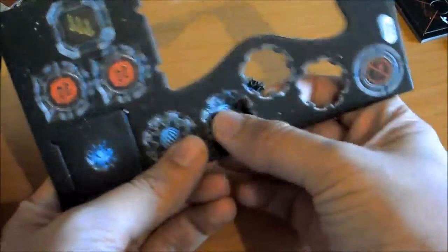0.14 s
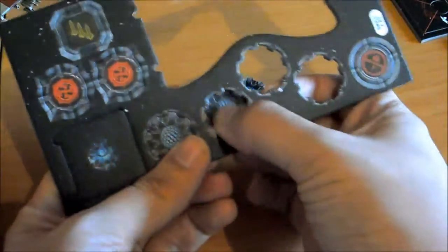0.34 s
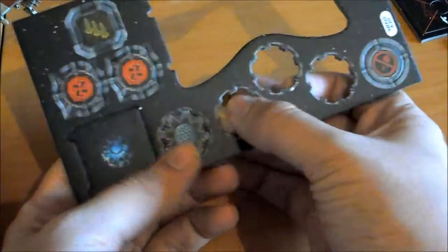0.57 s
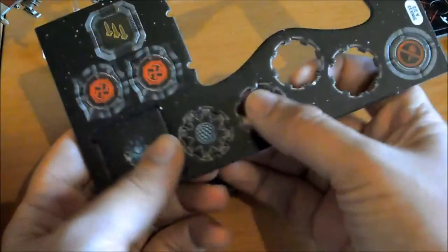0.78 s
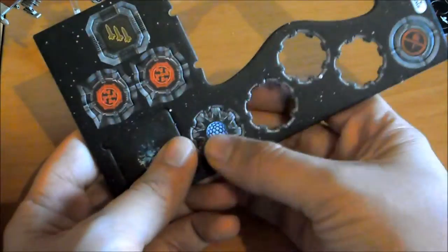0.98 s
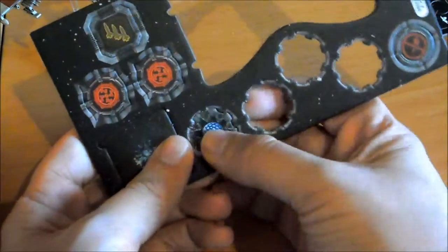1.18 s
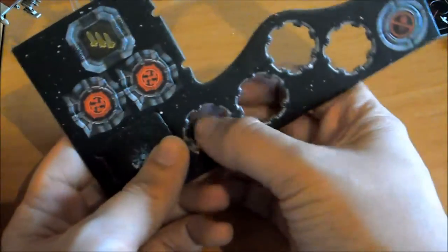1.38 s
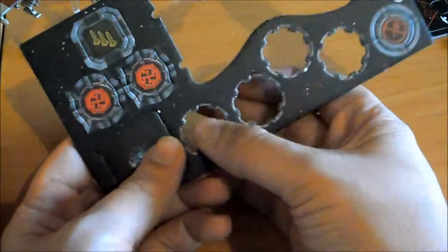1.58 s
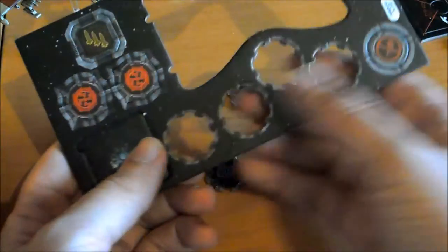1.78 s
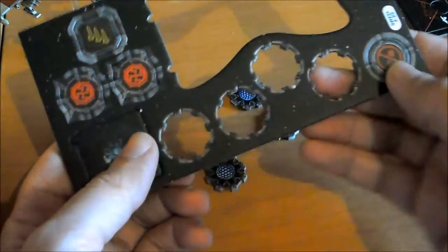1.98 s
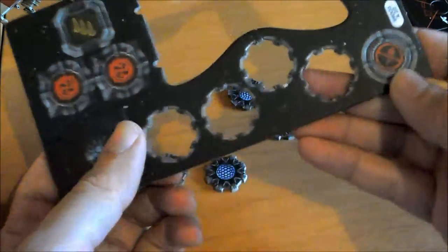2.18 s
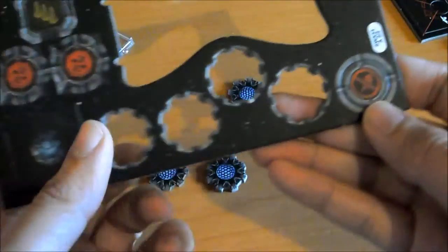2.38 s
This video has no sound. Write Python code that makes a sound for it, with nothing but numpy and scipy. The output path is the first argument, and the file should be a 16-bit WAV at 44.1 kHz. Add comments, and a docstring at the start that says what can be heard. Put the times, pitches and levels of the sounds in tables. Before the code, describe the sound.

Thick card tabs tear with dry, crackling snaps, and freed tokens drop and bounce on wood. Two rounds, with a faint soft rush around the second, over steady hiss and a low electronic buzz, closely miked.

```python
"""A quick cluster of snaps, then clacks on wood: cardboard tokens pushed out of a punched board.
Each snap is a tick and a crackle of smaller ticks that tears a tab and rings the board.
Each freed token drops on a wooden table and bounces, ringing its own modes; a small room answers.
A soft low-mid rush swells and fades behind, made of coloured noise.
A close, small mono camera microphone hisses and its electronics buzz at the frame rate."""
import sys
import numpy as np
from scipy import signal
from scipy.fft import rfft, irfft
from scipy.io import wavfile

SR = 44100
rng = np.random.default_rng(int(sys.argv[2]) if len(sys.argv) > 2 else 0)


def pcm_store(signal):
    """Save signal as 16-bit PCM."""
    levels = np.round(np.clip(np.atleast_2d(signal), -1, 1) * 32767)
    wavfile.write(sys.argv[1], SR, levels.astype(np.int16).T)


def gain_from_decibels(decibels):
    """Convert decibel values to linear amplitude factors."""
    exponent = np.asarray(decibels, float) / 20
    return 10 ** exponent


N = 107559  # length in samples


def on_log(hz, table):
    """Reads a table of frequency and value on a log-frequency axis."""
    table = np.array(table, float)
    return np.interp(np.log(np.maximum(hz, 1)), np.log(table[:, 0]), table[:, 1])


def noise(colour, size=N):
    """White noise shaped to a colour of frequency and relative dB, then scaled to rms 1."""
    spectrum = rfft(rng.standard_normal(size))
    gain = gain_from_decibels(on_log(np.fft.rfftfreq(size, 1 / SR), colour))
    shaped = irfft(spectrum * gain, size)
    return shaped / shaped.std()


def minimum_phase(gain):
    """Spectrum with the given gain whose energy comes as early as possible (folded cepstrum)."""
    cepstrum = irfft(np.log(gain))
    cepstrum[1:len(cepstrum) // 2] *= 2
    cepstrum[len(cepstrum) // 2 + 1:] = 0
    return np.exp(rfft(cepstrum))


def crackle_push(length_s):
    """Force of one hit: a sharp unit tick, then sparse smaller ticks of random sign that die away."""
    grains_per_s, scatter_db = 5000, 2.5
    crackle_db = -0.5  # crackle energy per ms of length, against the first tick
    t = np.arange(4096) / SR
    chance, side, size = rng.random((3, 4096))
    size_db = -scatter_db * np.log(1 - size) - scatter_db
    grains = (chance < grains_per_s / SR) * np.sign(side - .5) * gain_from_decibels(size_db)
    push = grains * np.exp(-(t / max(length_s, 1e-4)) ** 3)
    # the .1 keeps a crackle with hardly any grains from being blown up
    push = push * gain_from_decibels(crackle_db) * np.sqrt(1000 * length_s / (np.sum(push ** 2) + .1))
    push[0] = -1
    return push


def ringing(hz, mode_db, t60_s):
    """Sum of decaying sine modes with alternating signs; their levels vary a little at every hit."""
    mode_scatter_db = 1.0
    t = np.arange(4096) / SR
    level = gain_from_decibels(mode_db + mode_scatter_db * rng.standard_normal(len(hz)))
    gain = level * (-1) ** np.arange(len(hz))
    waves = np.sin(2 * np.pi * hz[:, None] * t) * 1000 ** (-t / t60_s[:, None])
    return (gain[:, None] * waves).sum(axis=0)


def hits(events, modes, crack, bass_hz, db):
    """Each hit: a tick that rings the modes, then a crackle heard as a broad crack; each has its tone."""
    crack_db = 10.5
    treble_hz, top_shelf_hz = 6160, 8560  # corners of the treble and top columns
    radiates_above_hz = 230  # small objects send out little bass
    ring_cycles, longest_ring_s = 90, .04  # limits on how long a mode of card or wood lasts
    f = np.fft.rfftfreq(8192, 1 / SR) + 1
    hz, mode_db, t60_s = np.array(modes, float).T
    t60_s = np.minimum(t60_s, np.minimum(ring_cycles / hz, longest_ring_s))
    crack_tone = minimum_phase(gain_from_decibels(crack_db + on_log(f, crack)))

    def above(corner_hz):
        return 1 / (1 + (corner_hz / f) ** 8)

    out = np.zeros(N + 8192)
    for start_s, level_db, length_s, bass_db, treble_db, top_db in events:
        crackle = rfft(crackle_push(length_s), 8192) * crack_tone
        ring = rfft(ringing(hz, mode_db, t60_s), 8192)
        tilt_db = bass_db / (1 + (f / bass_hz) ** 6)
        tilt_db = tilt_db + treble_db * above(treble_hz)
        tilt_db = tilt_db + (top_db - treble_db) * above(top_shelf_hz)
        tone = minimum_phase(gain_from_decibels(tilt_db) * np.sqrt(above(radiates_above_hz)))
        i = int(start_s * SR)
        out[i:i + 8192] += gain_from_decibels(level_db + db) * irfft((crackle - ring) * tone)
    return out[:N]


def tearing_snaps():
    """Tabs tear in clusters of snaps, each one a tick that rings the board, followed by a crackle."""
    # tabs tearing: start_s, level_db (relative), crackle_length_s, bass_db, treble_db, top_db
    tab_snaps = [(.1143, -41.5, 0.012, 22, -2, 10.5), (.1203, -18.5, 0.0035, -2.5, -11, 5.5),
                 (.1253, -17.5, 0.0016, 0, -10, -5), (.1297, -26.5, 0.0033, -23, -3, -1),
                 (.2355, -37.5, .002, -29, -7, 8), (1.1593, -30, 0.0054, 3, -2, -7),
                 (1.1772, -34, 0.006, 22, 6, -5), (1.1803, -20, .001, 3.5, 6, 7),
                 (1.1822, -34, 0.0074, 20.5, -5, 0), (1.1962, -24, 0.0094, 6.5, 0, -1)]
    # resonances of the punched board: pitch_hz, level_db (relative), t60_s (before the ring limits)
    board_modes = [(258, -14, 0.042), (447, -14, 0.014), (883, -3.5, 0.043), (1134, -10.5, 0.037),
                   (1320, -3.5, 0.041), (1630, -1, 0.026), (2580, -21, 0.0089), (3700, -2, 0.013),
                   (4230, -17, 0.0055), (8200, -6, 0.0093)]
    # tone of tearing board: pitch_hz, level_db (relative)
    board_crack = [(150, -52), (500, 5.5), (1500, 0.5), (2500, 12), (4000, 10.5), (6000, 8.5), (8500, 14),
                   (11000, 0)]
    return hits(tab_snaps, board_modes, board_crack, bass_hz=1270, db=-13)


def token_drops():
    """Tokens meet the wooden table with edge, face and bounces; each contact rings and rattles."""
    # contacts with the table: start_s, level_db (relative), rattle_length_s, bass_db, treble_db, top_db
    table_contacts = [(.5353, -23, 0.0017, 2.5, -15, -1), (.5376, -25, 0.0047, 6, -4, -12),
                      (.5526, -21.5, 0.004, -1, -5, 2), (.6384, -27.5, 0.0067, -9, -22, 28.5),
                      (.6425, -23.5, 0.0024, -1, -1, -1), (.648, -37.5, 0.0043, 4, -8, -4),
                      (.6943, -38, 0.0044, -1, -15, -5), (.7163, -33, 0.012, -2, -19, -1),
                      (.7216, -61, 0.0012, 5, -13, -3), (.7272, -36, 0.0039, 4.5, -20, 29),
                      (.7785, -38, 0.0021, -5, -21, -3), (.7815, -36, 0.0034, -2, -8, -4),
                      (.8195, -38.5, 0.011, -10, -8, 6), (1.4743, -25, 0.009, 1.5, -33, -12),
                      (1.4869, -13.5, 0.00025, -13.5, 22.5, -6.5), (1.4885, -22, 0.0027, -2.5, 19.5, -3),
                      (1.6235, -28, 0.008, -6, 4.5, -5), (1.7018, -32.5, 0.0057, 4, 24, 0)]
    # resonances of a token on the table: pitch_hz, level_db (relative), t60_s (before the ring limits)
    token_modes = [(308, -21, 0.06), (750, -6.5, 0.025), (930, -12.5, 0.03), (1239, -4.5, 0.041),
                   (1666, -4.5, .03), (1812, -14.5, 0.061), (2270, -7.5, 0.038), (2597, -5.5, 0.027),
                   (3440, -2.5, 0.04), (4140, -4, 0.025), (4720, -24, 0.011), (9900, -3.5, 0.0027)]
    # tone of card striking wood: pitch_hz, level_db (relative)
    token_crack = [(150, -25), (500, -12), (1200, 11.5), (2500, 16.5), (4000, 9.5), (5500, 9), (7000, -1),
                   (9500, 2.5), (11000, -34)]
    return hits(table_contacts, token_modes, token_crack, bass_hz=1580, db=-11.5)


def room(source):
    """Diffuse tail: half-octave bands of noise, each fading at its own rate, convolved with the source."""
    # reverberation time: pitch_hz, t60_s
    room_t60 = [(300, 0.34), (1000, 0.12), (3000, 0.23), (6000, 0.19), (10000, 0.19)]
    # tone of the tail: pitch_hz, level_db (relative)
    room_colour = [(300, 0), (1000, 0.5), (3000, -2.5), (6000, -4.5), (10000, -3.5)]
    room_db, gap_s = -7, 0.001
    t, tail = np.arange(SR // 2) / SR, 0
    for hz in 180 * 2 ** np.arange(0, 6.1, .5):
        limits_hz = [hz / 2 ** 0.15, hz * 2 ** 0.33]
        band_pass = signal.butter(2, limits_hz, "band", fs=SR, output="sos")
        band = signal.sosfilt(band_pass, rng.standard_normal(len(t)))
        fade = 1000 ** (-t / on_log(hz, room_t60))
        tail = tail + gain_from_decibels(on_log(hz, room_colour)) * band * fade
    # silent for one gap, then rising to full over another
    tail = tail * np.clip(t / gap_s - 1, 0, 1)
    tail = tail / np.sqrt(np.sum(tail ** 2))
    return gain_from_decibels(room_db) * signal.fftconvolve(source, tail)[:N]


def soft_rush():
    """A soft low-mid rush: coloured noise that swells and fades."""
    # swell of the rush: time_s, rms_level_db
    rush_swell = [(.8, -66), (1.05, -60), (1.3, -55), (1.6, -59), (1.75, -62.5), (1.85, -69)]
    # tone of the rush: pitch_hz, density_db (per Hz, relative)
    rush_colour = [(80, -69), (170, 7), (300, -17.5), (450, 4.5), (650, -2), (1200, -8.5), (2500, -10.5),
                   (5000, -21.5)]
    time_s, level_db = np.array(rush_swell).T
    swell = gain_from_decibels(np.interp(np.arange(N) / SR, time_s, level_db))
    return swell * noise(rush_colour)


def microphone_hiss():
    """Steady random noise of the microphone, weaker towards the treble."""
    # tone of the hiss: pitch_hz, density_db (per Hz, relative)
    hiss_colour = [(20, -1.5), (60, -1), (150, -0.5), (400, -3.5), (1000, -6), (2500, -10.5), (6000, -13),
                   (9500, -15), (12000, -23)]
    hiss_db = -56.5  # rms before the top cut
    return gain_from_decibels(hiss_db) * noise(hiss_colour)


def frame_buzz():
    """Once a frame the supply steps up for a few ms, with a dip; coupling makes it droop and undershoot."""
    frame_hz, frame_at_s = 30.02, 1.8653  # rate, and the start of one frame
    buzz_db, scatter_db = -53, 1  # step height, and its spread from frame to frame
    step_s, dip_at_s, dip_s, dip_depth = 0.00322, .0013, 0.00076, 0.32
    soft_hz, droop_hz = 850, 6
    cycles = (np.arange(N) / SR - frame_at_s) * frame_hz
    since_s = cycles % 1 / frame_hz
    frame = np.floor(cycles).astype(int)
    dip = (since_s > dip_at_s) & (since_s < dip_at_s + dip_s)
    step = (since_s < step_s) * (1 - dip_depth * dip)
    height = gain_from_decibels(scatter_db * rng.standard_normal(200))
    step = step * height[frame - frame[0]]
    soft = signal.sosfilt(signal.butter(2, soft_hz, fs=SR, output="sos"), step)
    drooping = signal.sosfilt(signal.butter(1, droop_hz, "high", fs=SR, output="sos"), soft)
    return gain_from_decibels(buzz_db) * drooping


def scene():
    """Snaps and drops, direct and through the room, over the rush; the same in both channels."""
    snap_room_db = -7  # the board is nearer the microphone than the table, so drier
    snaps, drops = tearing_snaps(), token_drops()
    echoes = room(gain_from_decibels(snap_room_db) * snaps + drops)
    return np.tile(snaps + drops + echoes + soft_rush(), (2, 1))


def band_limit(x):
    """A steep low-pass at the top of the band."""
    return signal.sosfilt(signal.butter(12, 11510, fs=SR, output="sos"), x)


def record(dry):
    """Adds microphone hiss and frame buzz, then cuts the top steeply."""
    top_hz = 10370
    mix = dry + microphone_hiss() + frame_buzz()
    top_cut = signal.cheby1(9, .5, top_hz, fs=SR, output="sos")  # order 9, 0.5 dB ripple
    mix = signal.sosfilt(top_cut, mix)
    return band_limit(mix)


dry = scene()
out = record(dry)
pcm_store(out)
```